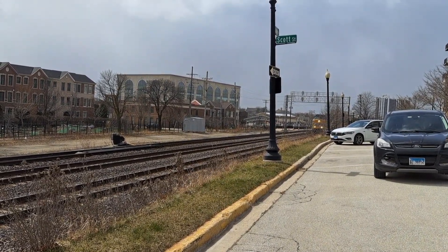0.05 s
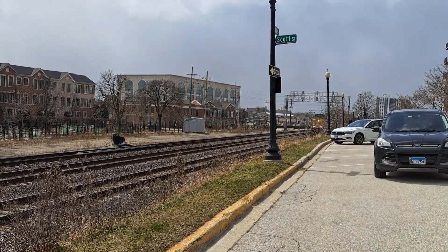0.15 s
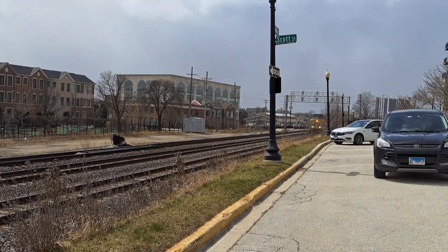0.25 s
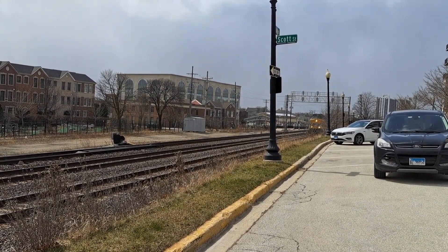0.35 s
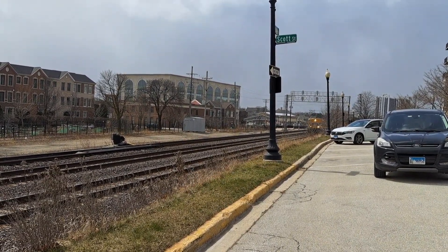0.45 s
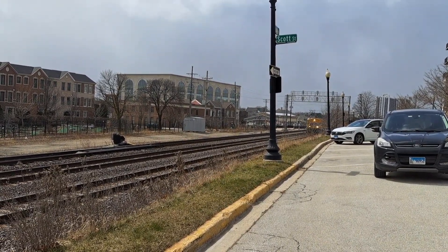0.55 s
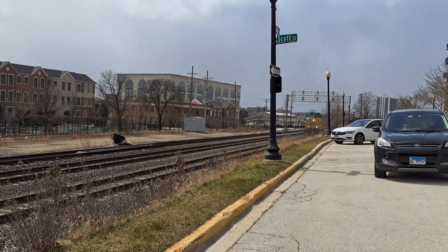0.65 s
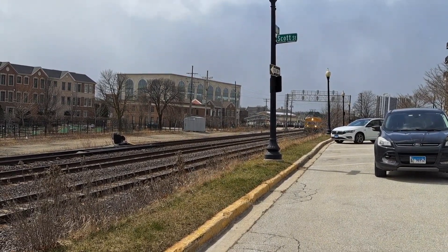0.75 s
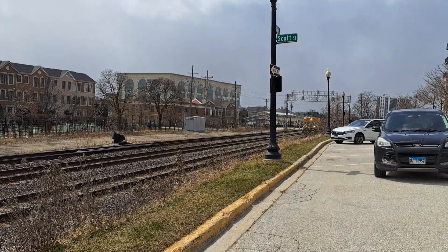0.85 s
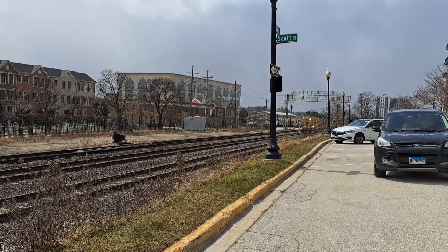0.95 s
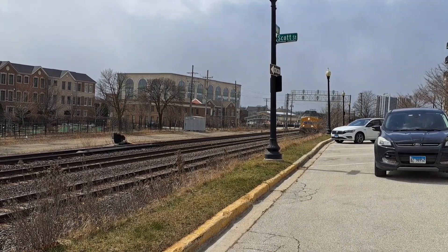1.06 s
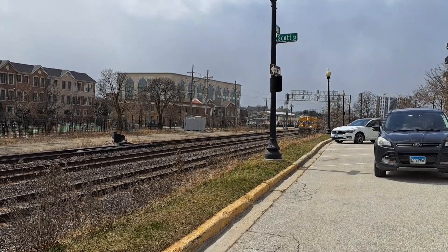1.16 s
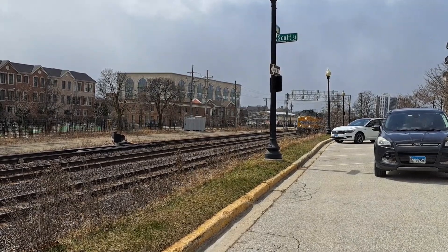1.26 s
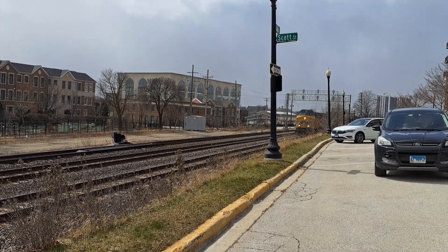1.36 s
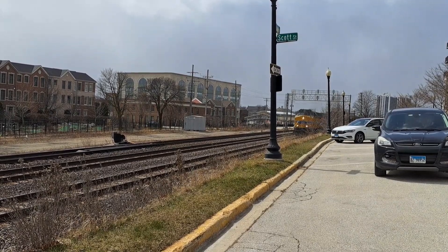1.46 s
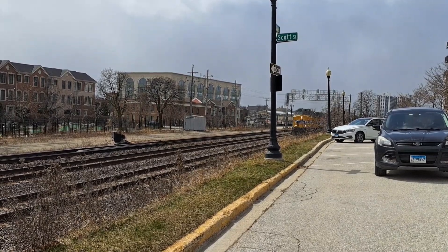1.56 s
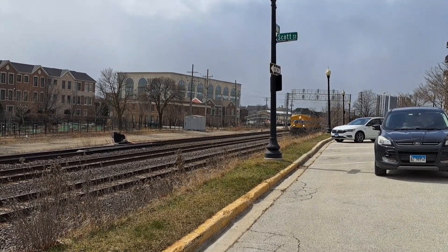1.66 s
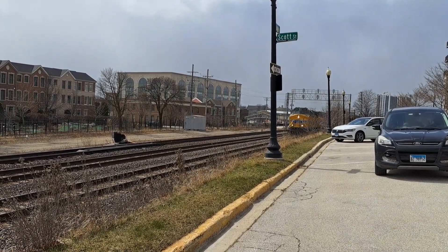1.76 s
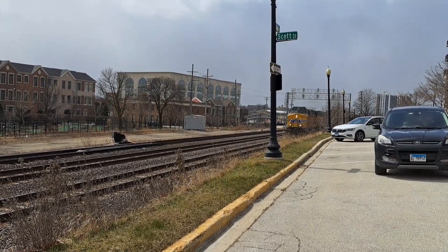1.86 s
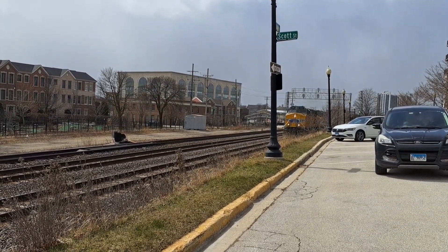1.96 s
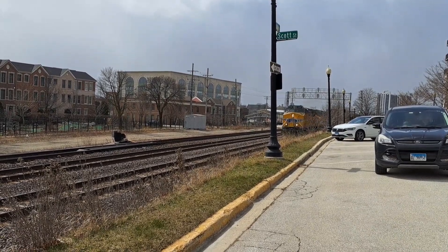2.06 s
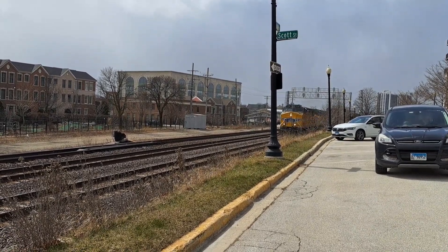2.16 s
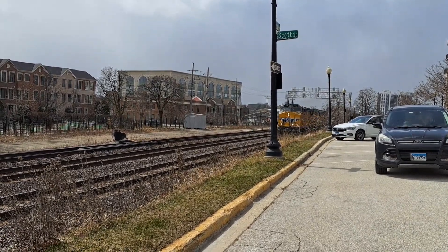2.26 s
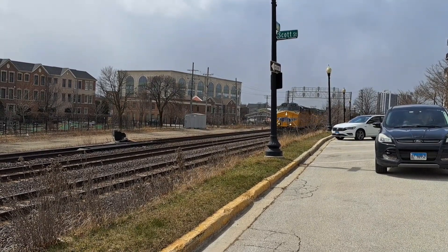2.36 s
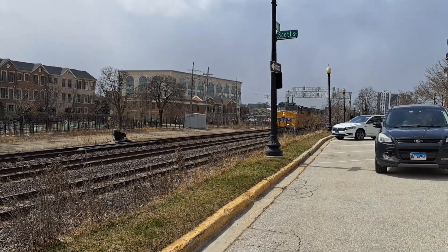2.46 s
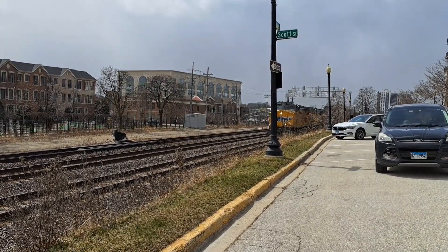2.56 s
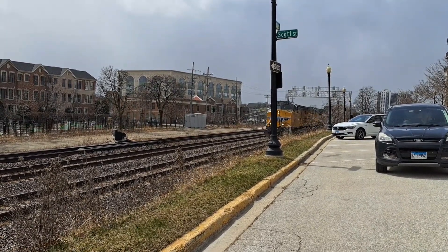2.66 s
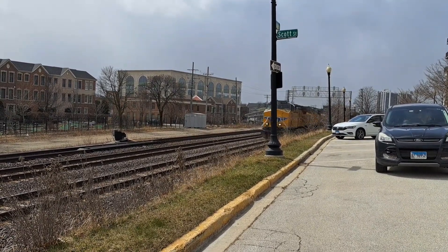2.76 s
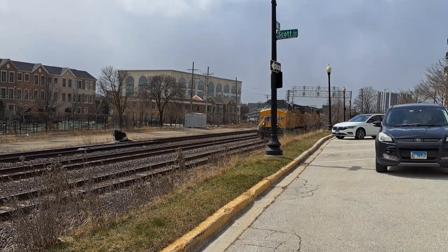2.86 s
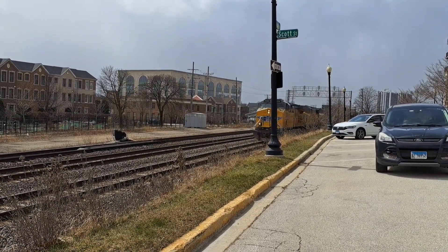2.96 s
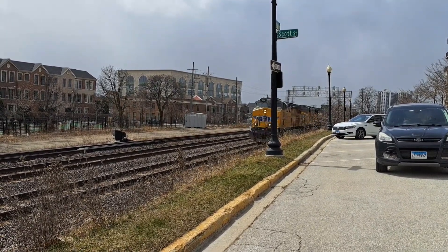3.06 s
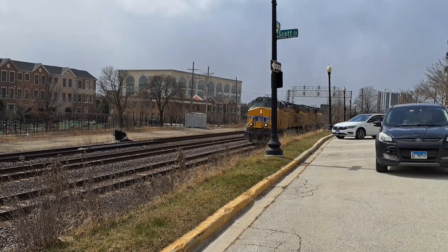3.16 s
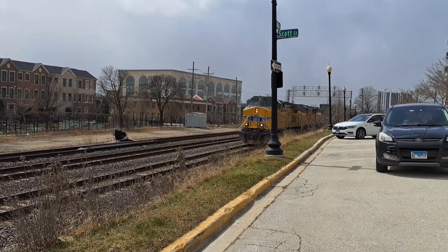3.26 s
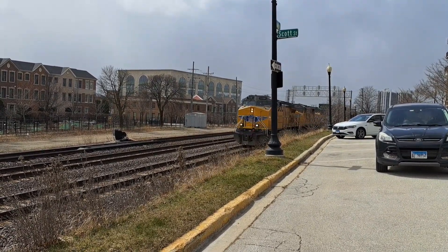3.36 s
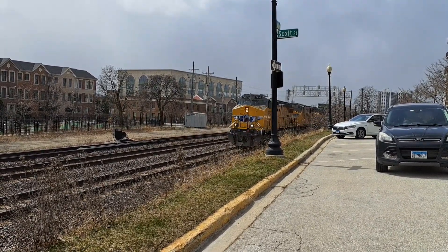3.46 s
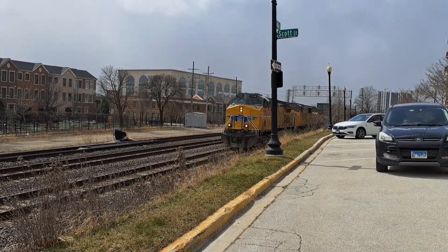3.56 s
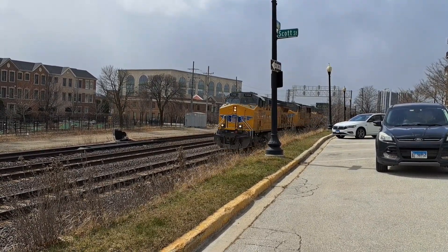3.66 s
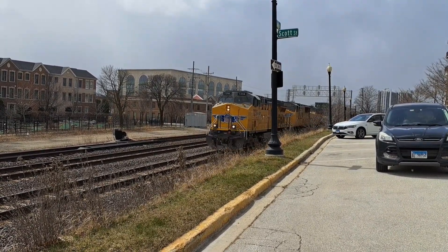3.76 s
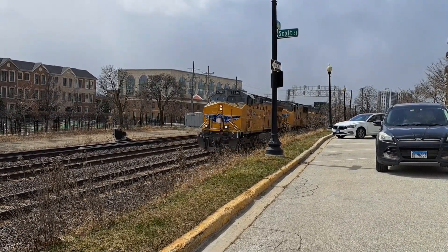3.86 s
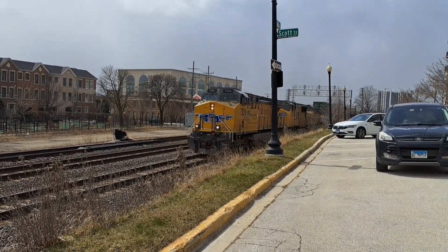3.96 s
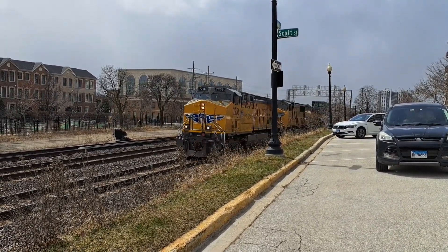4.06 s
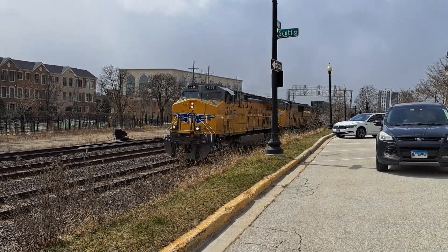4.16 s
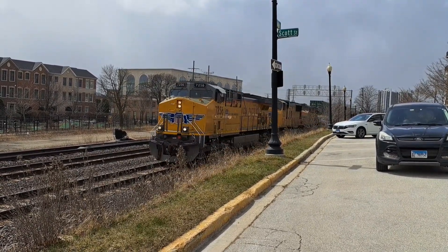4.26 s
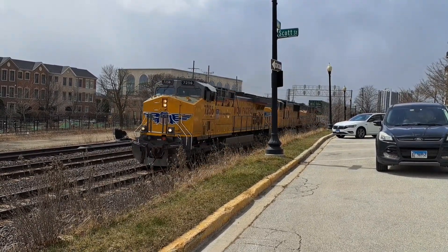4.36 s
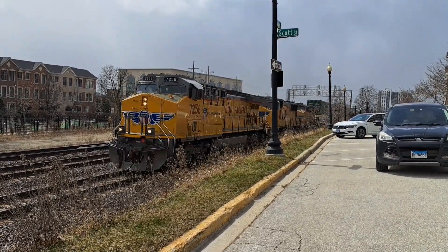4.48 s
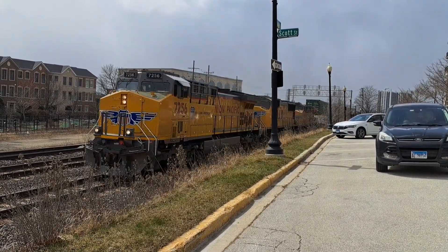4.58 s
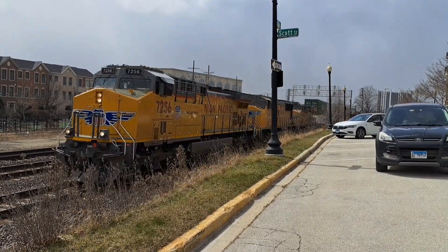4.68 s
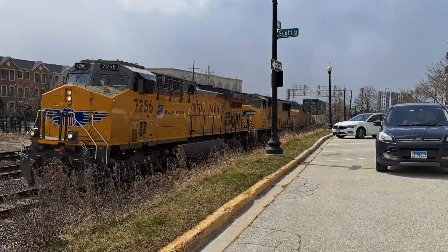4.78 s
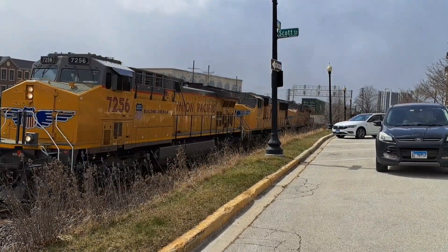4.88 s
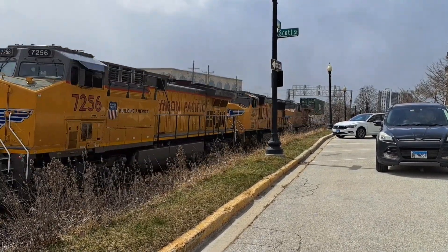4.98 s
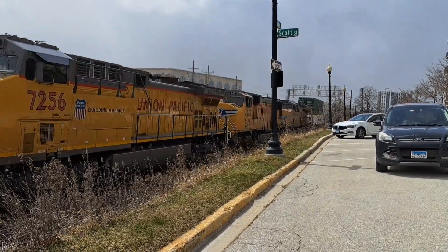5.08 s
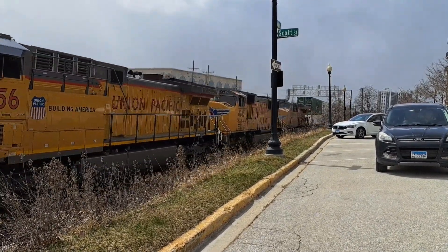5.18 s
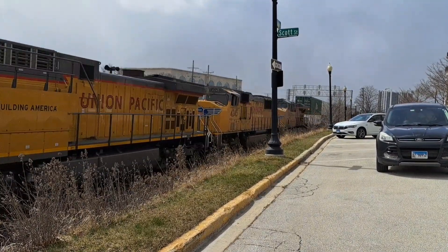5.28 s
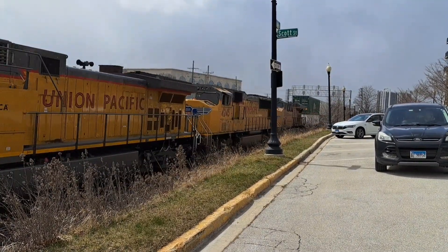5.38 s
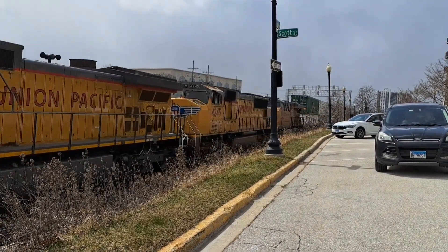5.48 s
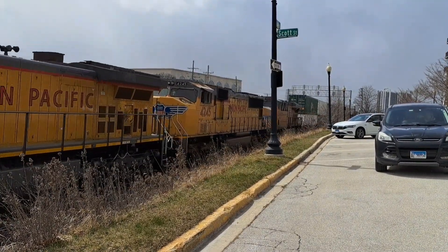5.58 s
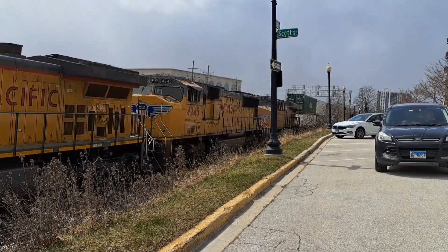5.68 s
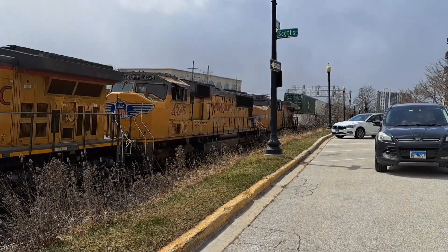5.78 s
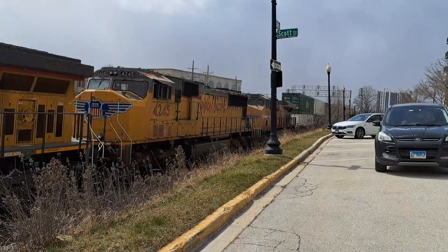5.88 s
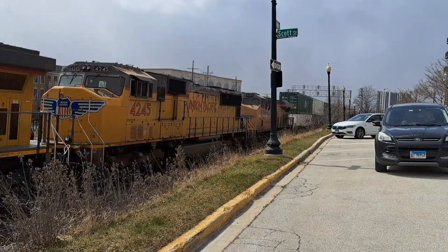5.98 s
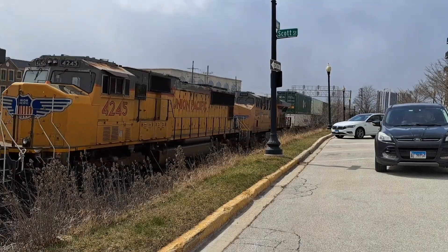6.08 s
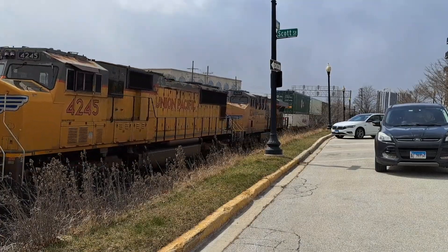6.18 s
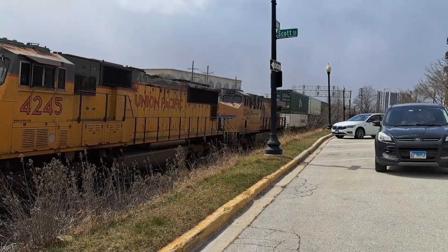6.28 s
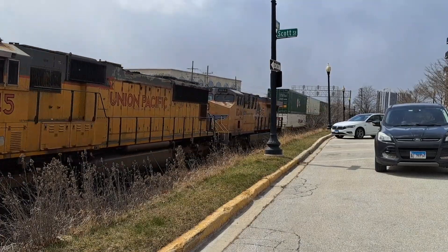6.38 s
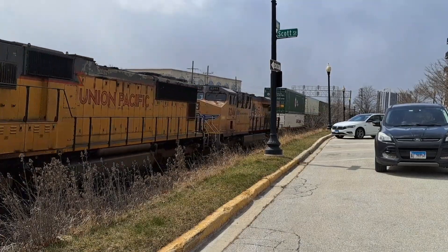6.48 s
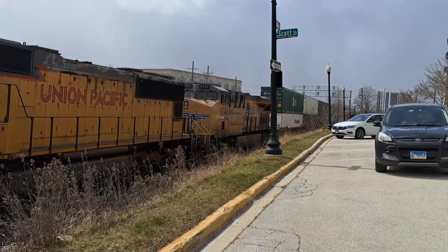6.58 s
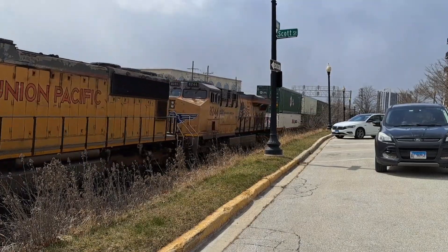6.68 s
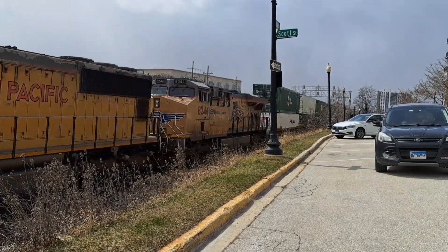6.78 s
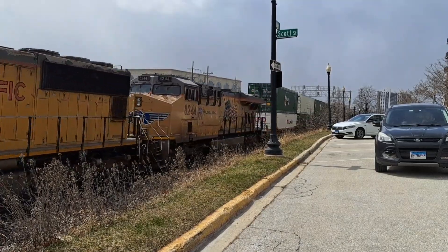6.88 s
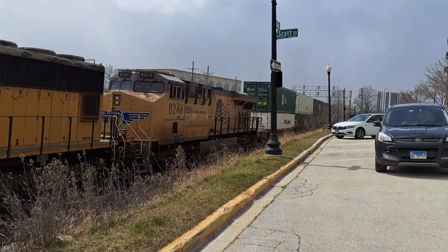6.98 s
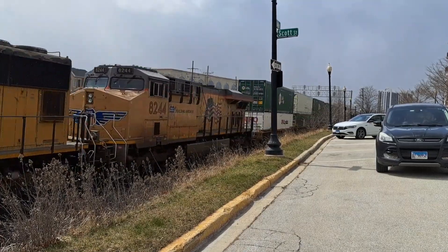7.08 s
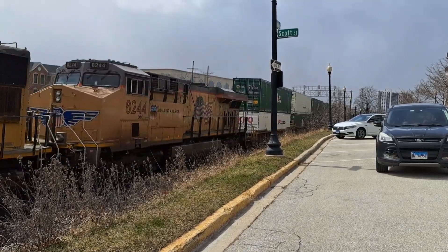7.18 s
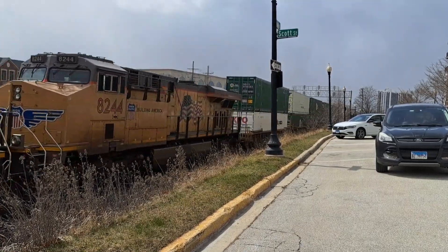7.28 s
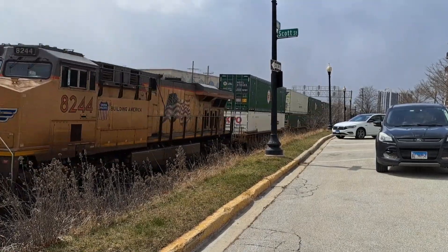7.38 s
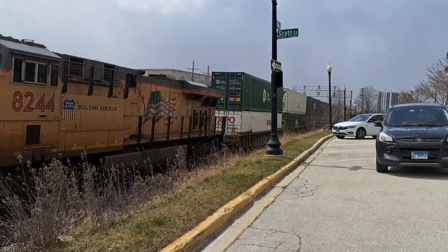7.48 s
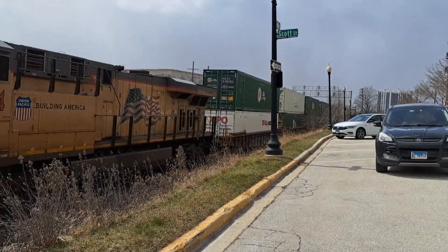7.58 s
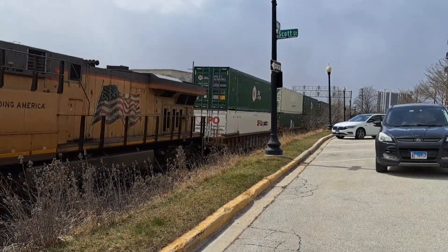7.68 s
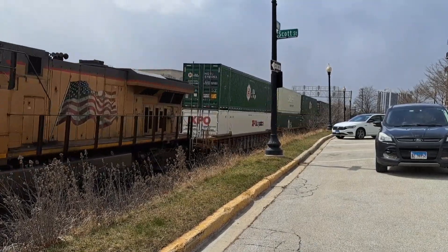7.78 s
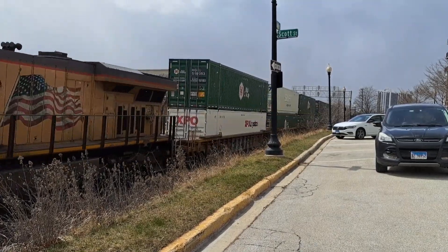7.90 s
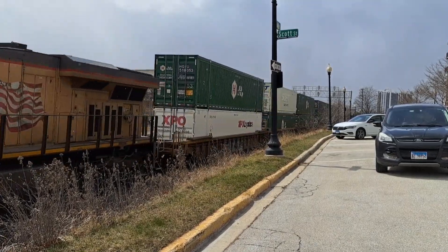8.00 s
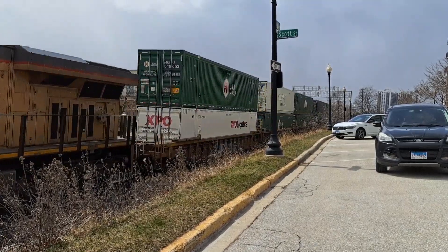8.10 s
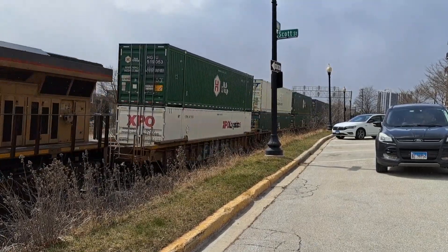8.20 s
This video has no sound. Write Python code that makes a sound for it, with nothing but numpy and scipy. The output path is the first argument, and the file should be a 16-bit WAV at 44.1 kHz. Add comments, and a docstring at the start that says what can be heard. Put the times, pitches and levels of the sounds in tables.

```python
"""Beside a railway track, three diesel locomotives at the head of a train approach and pass on the left.
Exhausts throb as wavering low tones and bursts of cylinder puffs; fans and gears are blurred tones that
sink in pitch. Wheels roar as bands of flickering noise, rails sing and a turbocharger whistles.
Mostly before they arrive, wind buffets the microphone with low noise, thuds and swells of turbulence."""
import sys
import numpy as np
from scipy import signal
from scipy.io import wavfile

SR = 44100
rng = np.random.default_rng(int(sys.argv[2]) if len(sys.argv) > 2 else 0)


def inscribe(sig):
    """Save sig as 16-bit PCM at rate SR to the path in sys.argv[1].

    A 1-D sig is mono; a 2-D sig holds one channel per row.
    Samples are clipped to [-1, 1] before scaling.
    """
    pcm = np.round(np.clip(np.atleast_2d(sig).T, -1, 1) * 32767)
    wavfile.write(sys.argv[1], SR, pcm.astype(np.int16))


N = 363384
TIME = np.arange(N) / SR
# train speed as a share of the speed of sound; distance to the track divided by train speed (s)
MACH, TRACK_S = 0.052, 0.45

# All levels in the tables come before the microphone's final gain in record().
# when each locomotive's machinery is level with the listener: locomotive name -> time_s
ABREAST = {"lead": 5.6, "second": 6.55, "third": 8.1}
# how alike left and right are for sounds close by: pitch_hz, likeness (correlation, 0 to 1)
NEAR_LIKENESS = [(60, 0.96), (200, 1), (400, 0.9), (1000, 0.81), (2000, 0.5), (5000, 0.1), (14000, 0.05)]
# how alike left and right are for wind at the microphone: pitch_hz, likeness (correlation, 0 to 1)
WIND_LIKENESS = [(50, 0.97), (130, 0.31), (300, 0.081), (700, 0)]


def from_db(db):
    """Turn decibels into a gain."""
    return 10 ** (np.asarray(db) / 20)


def rms_one(x):
    """Scale a sound to an average strength (rms) of 1."""
    return x / np.sqrt(np.mean(x ** 2) + 1e-20)


def in_time(rows):
    """Join the points of each column with straight lines, giving a value at every sample."""
    time_s, *columns = np.transpose(rows)
    return [np.interp(TIME, time_s, column) for column in columns]


def at_hz(points, hz):
    """Read a curve over pitch, with pitch on a log scale."""
    points_hz, values = np.array(points).T
    return np.interp(np.log(hz), np.log(points_hz), values)


def drift(rate_hz):
    """Smooth random wandering of spread 1, changing at about this rate."""
    # worked out at every eighth sample; the first 8000 values let the filter settle
    r = np.exp(-16 * np.pi * rate_hz / SR)
    slow = signal.lfilter([1], [1, -2 * r, r * r], rng.standard_normal(N // 8 + 8002))[8000:]
    return np.interp(np.arange(N) / 8, np.arange(len(slow)), rms_one(slow))


def pair(mid, side, alike):
    """Mix two unrelated signals into a left and a right that are alike to a given degree."""
    alike = np.clip(alike, -1, 1)
    return np.sqrt((1 + alike) / 2) * mid + np.sqrt((1 - alike) / 2) * side * np.array([[1], [-1]])


def running_phase(hz):
    """Add up a moving pitch into the phase of a wave."""
    return 2 * np.pi * np.cumsum(hz * np.ones(N)) / SR


def whine(hz, width_hz, alike):
    """A tone blurred by turbulence and by scattered paths; stereo, rms 1."""
    phase = running_phase(hz)
    cos, sin = np.cos(phase), np.sin(phase)
    mid, side = [drift(width_hz) * cos + drift(width_hz) * sin for _ in range(2)]
    return rms_one(pair(mid, side, alike))


def noise_bands(colour, likeness, patchy_db, flutter_hz, in_step, count, direct=1):
    """Stereo noise in count bands an octave, flickering partly in step, as (Hz, signal); total rms 1."""
    edges = 22 * 2 ** np.arange(0, 9.7, 1 / count)
    centres = np.sqrt(edges[1:] * edges[:-1])
    heard = (centres >= colour[0][0]) & (centres <= colour[-1][0])
    # the colour is in dB per Hz, so wider bands get more power
    gains = from_db(at_hz(colour, centres)) * np.sqrt(centres) * heard
    gains = gains / np.linalg.norm(gains)
    white, together = rng.standard_normal((2, 2, N)), drift(flutter_hz)
    for k in np.flatnonzero(heard):
        band_filter = signal.butter(2, edges[k:k + 2], "band", fs=SR, output="sos")
        mid, side = signal.sosfilt(band_filter, white[k % 2])
        flicker = from_db(patchy_db * (in_step * together + drift(flutter_hz)))
        alike = direct * at_hz(likeness, centres[k])
        yield centres[k], gains[k] * rms_one(flicker * pair(mid, side, alike))


def noise(*args, **settings):
    """All the noise bands added together."""
    return sum(band for hz, band in noise_bands(*args, **settings))


def swell(middle_s, spread_s):
    """A smooth rise and fall about a moment, of height 1."""
    return np.exp(-0.5 * ((TIME - middle_s) / spread_s) ** 2)


def panned(peak_db, pan_db):
    """Left and right gains, with pan_db the lead of left over right."""
    return from_db(peak_db + np.array([[0.5], [-0.5]]) * pan_db)


def doppler(locomotive):
    """Pitch factor of a locomotive: high on the way in, low once past."""
    along = TIME - ABREAST[locomotive]
    return 1 / (1 + MACH * along / np.hypot(along, TRACK_S))


def nearness(locomotive, ahead_s, reach_s, falloff):
    """Gain of a passing source: 1 at ahead_s before it is abreast, fading with distance beyond reach_s."""
    return (reach_s / np.hypot(TIME - ABREAST[locomotive] + ahead_s, reach_s)) ** falloff


def in_procession(levels, ahead_s, reach_s, falloff):
    """Joint gain of the same kind of source on several locomotives, passing one after another."""
    power = 0
    for locomotive, level_db in levels:
        power = power + (from_db(level_db) * nearness(locomotive, ahead_s, reach_s, falloff)) ** 2
    return np.sqrt(power)


def from_the_left(x):
    """Sound from the left reaches the right ear a little later."""
    # lead of the left ear as the train swings from ahead to the side: time_s, lead_ms
    ear_lead = [(0, 0.19), (3.9, 0.13), (4.5, .02), (5.0, 0.091), (5.25, 0.31), (5.7, 0.48), (8.24, 0.45)]
    lead_ms, = in_time(ear_lead)
    # four times finer samples allow delays of a fraction of a sample
    finer_right = signal.resample_poly(x[1], 4, 1)
    right = np.interp(TIME - lead_ms / 1000, np.arange(4 * N) / (4 * SR), finer_right)
    return np.array([x[0], right])


def background():
    """A faint, even hiss under everything."""
    # tone of the hiss: pitch_hz, level_db (per Hz, relative)
    hiss_colour = [(2500, -5), (6000, 1), (10000, -4), (12000, 6), (17500, -2)]
    return from_db(-62.5) * noise(hiss_colour, NEAR_LIKENESS, patchy_db=0.0, flutter_hz=12,
                                  in_step=0.4, count=2, direct=0)


def wind():
    """Lumpy eddies at each microphone opening make a light, low breeze."""
    # breeze between gusts: time_s, level_db (relative, raised by 4 dB below)
    breeze_levels = [(0, -24), (.5, -23.5), (1.2, -27.5), (2, -30), (2.6, -26), (3.2, -30.5), (4.3, -27.5),
                     (4.9, -32)]
    # tone of the breeze: pitch_hz, level_db (per Hz, relative)
    breeze_colour = [(30, 2), (45, 4.5), (90, 7), (130, 5.5), (170, 1.5), (240, -3.5), (330, -5.5),
                     (480, -15), (800, -28), (2000, -69)]
    breeze_db, = in_time(breeze_levels)
    return from_db(breeze_db + 4.0) * noise(breeze_colour, WIND_LIKENESS, patchy_db=3.5,
                                            flutter_hz=41.5, in_step=0.85, count=2)


def gusts():
    """Gusts of wind: a hollow flapping with little deep bass."""
    # gusts of wind: middle_s, spread_s, level_db
    gust_events = [(0.13, .05, -26.5), (0.443, 0.048, -17.5), (0.517, 0.017, -19), (0.584, .02, -26),
                   (0.635, 0.019, -18.5), (0.869, 0.014, -24), (0.934, 0.032, -22), (1.015, 0.038, -23),
                   (1.465, 0.03, -20.5), (2.197, 0.04, -29), (2.527, 0.04, -28.5), (2.74, 0.04, -25),
                   (2.895, 0.08, -27.5), (3.357, 0.023, -27.5), (3.617, 0.17, -32)]
    # tone of the gusts: pitch_hz, level_db (per Hz, relative)
    gust_colour = [(60, -1), (110, 1), (200, 3.5), (300, 1.5), (440, -1.5), (650, -15.5), (1000, -31),
                   (2000, -44), (4000, -64)]
    power = 0
    for middle_s, spread_s, level_db in gust_events:
        power = power + (from_db(level_db) * swell(middle_s, spread_s)) ** 2
    return np.sqrt(power) * noise(gust_colour, WIND_LIKENESS, patchy_db=3.5,
                                  flutter_hz=60, in_step=1.0, count=2)


def thuds():
    """A big, slow eddy pushes on both openings at once: a cycle or two of deep bass."""
    # low thuds of wind: middle_s, peak_db
    thud_events = [(.8, -15.5), (1.089, -11), (1.183, -12.5), (1.251, -15), (1.306, -15), (1.689, -16.5),
                   (2.235, -14), (2.778, -8), (2.941, -14), (3.138, -14.5), (3.192, -15), (3.285, -16),
                   (3.355, -15), (3.688, -14), (3.79, -13), (3.885, -14), (4.088, -12), (4.158, -10)]
    usual_hz, spread_s = 81.3, 0.0088
    age = np.arange(-1500, 1500) / SR
    out = np.zeros(N)
    chances = rng.uniform(-0.99, 1, (len(thud_events), 2))
    for (middle_s, peak_db), (start_phase, size) in zip(thud_events, chances):
        # each thud has its own pitch, within about 12 percent
        wave = np.cos(2 * np.pi * usual_hz * (1 + 0.12 * size) * age + np.pi * start_phase)
        start = round((middle_s + age[0]) * SR)
        out[start:start + len(age)] += from_db(peak_db) * np.exp(-0.5 * (age / spread_s) ** 2) * wave
    return out


def buffets():
    """An eddy hits the openings: a quick, dull swell of turbulence, different in each, that dies away."""
    # single buffets: time_s, peak_db, upper_edge_hz, left_over_right_db
    buffet_events = [(0.388, -22, 600, -3), (0.419, -11, 420, 3), (0.437, -16, 700, -2),
                     (0.465, -13, 1100, -10), (.505, -6.5, 348, 5), (.527, -9, 400, -4),
                     (0.553, -8, 447, 1), (.622, -7, 514, 0), (.638, -11.5, 400, 9), (.854, -20, 900, 0),
                     (.933, -16, 543, 7), (0.950, -14, 800, -6), (1.196, -16.5, 420, 0),
                     (1.249, -19, 325, -9), (1.406, -13.5, 480, -2), (1.44, -20, 680, 2),
                     (1.458, -21, 550, -5), (1.495, -11.5, 440, 1), (1.707, -31, 700, 0),
                     (2.373, -22, 604, 0), (2.821, -12.5, 850, -10.5), (2.866, -19, 895, -9),
                     (2.881, -9, 520, -6), (2.94, -14.5, 450, 0), (3.146, -17, 900, -5),
                     (3.305, -20, 500, -5), (3.359, -17, 450, 2), (3.655, -20, 600, 0)]
    out = np.zeros((2, N))
    age = np.arange(4000) / SR
    for time_s, peak_db, edge_hz, pan_db in buffet_events:
        eddy = age * np.exp(-age / 0.0023) * rng.standard_normal((2, len(age)))
        puff = signal.sosfilt(signal.butter(2, [140, edge_hz], "band", fs=SR, output="sos"), eddy)
        puff = signal.sosfilt(signal.butter(2, edge_hz, fs=SR, output="sos"), puff)
        start = round((time_s - 0.003) * SR)  # begins 3 ms early, leaving time to swell
        out[:, start:start + len(age)] += panned(peak_db, pan_db) * puff / abs(puff).max()
    return out


def ticks():
    """A short, gritty snap of noise close to the microphone dies within some milliseconds."""
    # dry ticks: start_s, peak_db, left_over_right_db
    tick_events = [(.463, -33, 3), (.623, -39, -7), (0.918, -24.5, -6)]
    decay_s, low_hz, high_hz = 0.002, 905, 2320
    out = np.zeros((2, N))
    age = np.arange(1500) / SR
    for start_s, peak_db, pan_db in tick_events:
        snap = age * np.exp(-age / decay_s) * rng.standard_normal((2, len(age)))
        snap = signal.sosfilt(signal.butter(1, [low_hz, high_hz], "band", fs=SR, output="sos"), snap)
        snap = signal.sosfilt(signal.butter(2, 4200, fs=SR, output="sos"), snap)
        start = round(start_s * SR)
        out[:, start:start + len(age)] += panned(peak_db, pan_db) * snap / abs(snap).max()
    return out


def rails():
    """The rails ring at a steady, blurred pitch under the wheels, well ahead of the train."""
    # singing of the rails: time_s, level_db
    song_levels = [(0, -35.5), (0.7, -44.5), (1.6, -44), (2.4, -34.5), (3.0, -38.5), (4, -44.5),
                   (5.2, -33.5), (7.3, -44.5), (7.8, -31.5), (8.24, -36)]
    level_db, = in_time(song_levels)
    return from_db(level_db) * whine(hz=977.4, width_hz=52.5, alike=0.13)


def wheels():
    """Wheels roll with a roar whose treble opens as the train draws near, and scrape on the rails."""
    # rolling roar: time_s, level_db
    roar_levels = [(0, -38.5), (0.3, -39.5), (0.7, -45.5), (1.6, -42), (2.6, -35.5), (3.2, -36.5),
                   (4, -36.5), (4.75, -31), (5.5, -28), (6.5, -26.5), (7.1, -28.5), (7.5, -31.5),
                   (8.24, -29.5)]
    # share of the left-right likeness left while sound arrives by scattered paths: time_s, share (0 to 1)
    direct_share = [(3.6, 0.28), (4.7, 0.82)]
    # tone of the roar: pitch_hz, level_db (per Hz, relative)
    roll_colour = [(250, 10), (400, 0), (600, -0.5), (800, 0.5), (1200, -6), (1600, -5.5), (2000, -3),
                   (2400, -9.5), (3000, -10.5), (4300, -11.5), (6500, -17), (10000, -24), (12500, -24),
                   (17500, -28)]
    # change of that tone when far away: pitch_hz, change_db
    far_colour = [(300, -7.5), (520, 6.5), (750, 2), (1300, 2), (1900, 0), (2600, -8.5), (3400, -7.5),
                  (4800, -8), (7000, -8.5), (12000, -6)]
    # squeals and scrapes: middle_s, spread_s, pitch_hz, width_hz, level_db
    scrape_events = [(2.58, 0.14, 4230, 700, -58), (2.6, 0.18, 1950, 250, -52), (4.3, 0.45, 4750, 324, -52),
                     (4.336, 0.2, 1623, 30, -42.5), (4.713, 0.06, 5400, 230, -44),
                     (4.74, 0.17, 3310, 535, -41), (4.8, 0.04, 7360, 700, -43),
                     (4.83, .025, 3800, 800, -39), (5.048, .025, 2990, 500, -37),
                     (6.55, 0.14, 3530, 207, -41.5), (7.094, 0.03, 4770, 100, -42),
                     (7.197, 0.11, 2260, 220, -36), (7.21, .04, 2630, 220, -34.5),
                     (7.17, 0.025, 4050, 600, -37.5), (7.303, 0.11, 5320, 150, -43.5)]
    opens_s, opening_s = 4.28, 0.22  # middle and spread of the treble's opening

    (level_db,), (direct,) = in_time(roar_levels), in_time(direct_share)
    far = 1 / (1 + np.exp((TIME - opens_s) / opening_s))
    bands = noise_bands(roll_colour, NEAR_LIKENESS, patchy_db=2.5, flutter_hz=21.6,
                        in_step=0.25, count=4, direct=direct)
    out = 0
    for hz, band in bands:
        out = out + from_db(level_db + far * at_hz(far_colour, hz)) * band
    for middle_s, spread_s, hz, width_hz, scrape_db in scrape_events:
        out = out + from_db(scrape_db) * swell(middle_s, spread_s) * whine(hz, width_hz, alike=0.2)
    return out


def whines():
    """Gears and blowers swell and sink as they pass; a turbocharger gives a breathy, wavering whistle."""
    # turbocharger whistle, around which pitch and level waver: time_s, pitch_hz, level_db
    turbo_curve = [(0, 8920, -94), (6.35, 8650, -53), (6.65, 8657, -45.5), (6.85, 8540, -49),
                   (7.15, 8350, -40), (7.4, 8050, -43.5), (7.7, 8050, -47), (7.95, 7830, -47.5),
                   (8.24, 7860, -41)]
    # gears and blowers: locomotive, ahead_s (loudest this long before abreast),
    # reach_s (heard this long either side), pitch_hz (at rest), width_hz, level_db (when loudest)
    gear_tones = [("lead", -0.15, 0.37, 499, 3.3, -29.5), ("second", 0.1, 0.7, 482, 13.5, -31),
                  ("third", 0.29, 0.47, 452, 13.3, -34.5), ("lead", -0.12, 0.41, 1490, 20, -37),
                  ("second", 0, 0.27, 1480, 30, -37), ("third", 0.16, .55, 1450, 15, -43),
                  ("lead", 0.33, 0.28, 1795, 10.4, -35), ("lead", -.1, 0.58, 1900, 34, -44),
                  ("second", 0, 0.28, 1760, 39, -39.5), ("third", 0, .55, 1700, 26, -42),
                  ("lead", 0.55, 0.46, 2120, 270, -40), ("second", 0.1, 0.16, 2050, 76, -44),
                  ("second", 0.15, .35, 2420, 89, -42.5), ("lead", 0.07, 0.24, 720, 100, -34.5),
                  ("lead", 0.35, 0.47, 1250, 114, -40.5)]
    turbo_hz, turbo_db = in_time(turbo_curve)
    whistle = whine(turbo_hz + 70 * drift(39.6), width_hz=200, alike=0.13)
    out = from_db(turbo_db + 2.8 * drift(8.5)) * whistle
    for locomotive, ahead_s, reach_s, hz, width_hz, level_db in gear_tones:
        near = nearness(locomotive, ahead_s, reach_s, falloff=1.56)
        tone = whine(hz * doppler(locomotive), width_hz, alike=at_hz(NEAR_LIKENESS, hz))
        out = out + from_db(level_db) * near * tone
    return out


def fans():
    """Cooling fans slide down in pitch as they pass, in a rush of air from the radiators."""
    # rush of air: locomotive, level_db (when loudest)
    rush_levels = [("lead", -29), ("second", -45)]
    # tone of the rush: pitch_hz, level_db (per Hz, relative)
    rush_colour = [(350, -10), (650, 3.5), (1300, -3), (2000, -6.5), (3200, -26.5), (6000, -15),
                   (9500, -27), (12500, -18.5), (17500, -20)]
    # fans: locomotive, ahead_s (loudest this long before abreast),
    # reach_s (heard this long either side), pitch_hz (at rest), width_hz, level_db (when loudest)
    fan_tones = [("lead", 0.19, 0.4, 1000, 10.4, -27.5), ("lead", 1, 0.24, 995, 13, -33.5),
                 ("lead", 0.21, 0.55, 1020, 77, -30), ("second", 0.47, 0.34, 1005, 10, -31),
                 ("second", -0.13, 0.41, 945, 13.5, -28), ("second", -0.43, 0.45, 1010, 25, -36.5),
                 ("third", 0.47, 0.27, 890, 9, -32), ("third", 0.24, 0.25, 958, 8.6, -29),
                 ("third", -.05, .25, 995, 22, -34)]
    rush = noise(rush_colour, NEAR_LIKENESS, patchy_db=1.5, flutter_hz=24, in_step=0.31, count=2)
    out = in_procession(rush_levels, ahead_s=0.032, reach_s=0.62, falloff=2.8) * rush
    for locomotive, ahead_s, reach_s, hz, width_hz, level_db in fan_tones:
        near = nearness(locomotive, ahead_s, reach_s, falloff=1.7)
        out = out + from_db(level_db) * near * whine(hz * doppler(locomotive), width_hz, alike=0.66)
    return out


def rumble():
    """Turbulent exhaust gas and shaking bodywork swell as each locomotive goes by."""
    # rumble: locomotive, level_db (when loudest)
    rumble_levels = [("lead", -21), ("second", -20.5), ("third", -22)]
    # tone of the rumble: pitch_hz, level_db (per Hz, relative)
    rumble_colour = [(30, -28), (45, -10), (56, 4), (70, 6.5), (100, 4.5), (140, -0.5), (200, -0.5),
                     (300, -10.5), (420, -10), (650, -22.5), (1200, -58)]
    shaking = noise(rumble_colour, NEAR_LIKENESS, patchy_db=1.62, flutter_hz=15.7, in_step=0.92, count=2)
    return in_procession(rumble_levels, ahead_s=0.18, reach_s=1.0, falloff=2.2) * shaking


def firing(cycle_hz, count):
    """One puff per cylinder, each with a strength of its own, heard through the stack; rms 1."""
    cylinder_spread_db, cycle_spread_db, jitter_s = 8, 2, 0.00024
    cycles = running_phase(cycle_hz) / (2 * np.pi)
    fired = np.flatnonzero(np.diff(np.floor(count * cycles)))
    cylinder_db = cylinder_spread_db * rng.standard_normal(count)
    strength, lateness = rng.standard_normal((2, N))[:, :len(fired)]
    moments = np.clip(fired + (jitter_s * SR * lateness).astype(int), 0, N - 1)
    puffs = np.zeros(N)
    puffs[moments] = from_db(np.resize(cylinder_db, len(fired)) + cycle_spread_db * strength)
    stack = signal.butter(2, [153, 393], "band", fs=SR, output="sos")  # lets through 153 to 393 Hz
    return rms_one(signal.sosfilt(stack, puffs))


def engines():
    """Close by, each engine adds a deep note and the rough chug of its cylinders, sinking as it passes."""
    # cylinders firing in turn: locomotive, cycles_hz (engine cycles a second at rest), level_db (when loudest)
    chugs = [("lead", 8.5, -30), ("second", 14.6, -28.5), ("third", 8.1, -33)]
    # deep exhaust notes: locomotive, pitch_hz (at rest), width_hz, level_db (when loudest)
    deep_notes = [("lead", 97, 1.27, -21.5), ("second", 98, 1.64, -22.5), ("third", 76, 1.8, -27)]
    out = 0
    for locomotive, cycle_hz, level_db in chugs:
        near = nearness(locomotive, ahead_s=0.029, reach_s=0.56, falloff=1.47)
        out = out + from_db(level_db) * near * firing(cycle_hz * doppler(locomotive), count=12)
    for locomotive, hz, width_hz, level_db in deep_notes:
        near = nearness(locomotive, ahead_s=0, reach_s=0.48, falloff=1.3)
        out = out + from_db(level_db) * near * whine(hz * doppler(locomotive), width_hz, alike=0.99)
    return out


def exhaust():
    """Uneven firing gives a beating throb with weak overtones, a drone and a hum."""
    # throb, which comes and goes while the train is far: time_s, level_db (relative, cut by 3 dB below)
    throb_levels = [(0, -25), (0.7, -33), (0.98, -33), (1.08, -18), (1.33, -22), (1.45, -31), (2.05, -29),
                    (2.17, -13.5), (2.42, -21), (2.75, -15.5), (2.84, -29.5), (4.15, -24), (4.5, -15.5),
                    (5.0, -22), (5.22, -10.5), (5.45, -17.5), (7.4, -11.5), (8.24, -15.5)]
    # firing rate of the loudest engine, around which it wavers: time_s, rate_hz
    firing_rate = [(0, 79.17), (2.7, 78.8), (4.2, 77.25), (4.8, 78.1), (5.4, 80), (6.4, 79.65),
                   (6.9, 78.85), (7.4, 75.5), (7.9, 71.9), (8.24, 72.5)]
    # flutter of the throb, deep while it comes from afar through gusty air: time_s, depth_db
    throb_flutter = [(3.8, 4.0), (5.0, 2.0)]
    # drone, around which the pitch wavers: time_s, pitch_hz
    drone_pitch = [(4, 117), (5.3, 115), (6.2, 118), (7.1, 119), (7.7, 117.5), (8.24, 115)]
    # drone: locomotive, level_db (when loudest)
    drone_levels = [("lead", -24.5), ("third", -17)]
    # engine hum: time_s, pitch_hz (wavers around this), level_db (relative, cut by 2 dB below)
    hum_curve = [(4.6, 218, -62), (5.5, 218, -29.5), (6.5, 217, -26.5), (7.5, 218, -27.5),
                 (8.24, 214.3, -31.5)]

    (throb_db,), (firing_hz,), (flutter_db,) = map(in_time, (throb_levels, firing_rate, throb_flutter))
    phase = running_phase(firing_hz * (1 + 0.03523 * drift(12.84)))
    throb = np.cos(phase) + from_db(-24) * np.cos(2 * phase) + from_db(-36) * np.cos(3 * phase)
    # the engines beat against each other about 6.3 times a second
    beat = 1 + 0.27 * np.cos(running_phase(6.3 + 2.03 * drift(2.74)))
    # the subtracted part keeps about the same mean power
    uneven = from_db(flutter_db * (np.minimum(drift(27), 1.6) - flutter_db / 10))
    throb = from_db(throb_db - 3.0) * rms_one(throb * beat * uneven)

    (drone_hz,), (hum_hz, hum_db) = in_time(drone_pitch), in_time(hum_curve)
    drone_wave = np.sin(running_phase(drone_hz + 2.61 * drift(10.6)))
    drone = rms_one(drone_wave * from_db(2.8 * drift(12)))
    drone = in_procession(drone_levels, ahead_s=0.083, reach_s=0.5, falloff=0.99) * drone
    hum_wave = np.sin(running_phase(hum_hz + 3.426 * drift(8.63)))
    hum = from_db(hum_db - 2.0) * rms_one(hum_wave * from_db(2.2 * drift(8.9)))
    return throb + drone + hum


def scene():
    """Exhaust bass reaches both ears alike, other train sounds come from the left, wind acts on the microphone."""
    # brief dips of the bass: middle_s, spread_s, depth_db
    dip_events = [(0.666, 0.038, -6.5), (0.89, 0.08, -3), (1.46, 0.041, -8), (1.627, 0.016, -3.5),
                  (2.053, 0.016, -16), (2.81, 0.0079, -14), (3.97, 0.036, -8)]
    dips_db = sum(depth_db * swell(middle_s, spread_s) for middle_s, spread_s, depth_db in dip_events)
    bass = from_db(dips_db) * (exhaust() + rumble() + wind())
    trackside = from_the_left(engines() + fans() + rails() + whines() + wheels())
    trackside = trackside * from_db([[-0.4], [0.4]])  # left slightly down, right slightly up
    return bass + trackside + gusts() + thuds() + buffets() + ticks() + background()


def record(dry):
    """The small microphone loses the deepest bass; peaks are rounded and the top is cut."""
    thin = signal.sosfilt(signal.butter(4, 35, "high", fs=SR, output="sos"), dry)
    rounded = 1.692 * np.tanh(thin / 1.5)
    return signal.sosfilt(signal.ellip(10, 0.2, 80, 15800, fs=SR, output="sos"), rounded)


dry = scene()
out = record(dry)
inscribe(out)
```